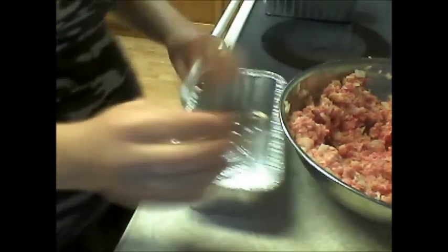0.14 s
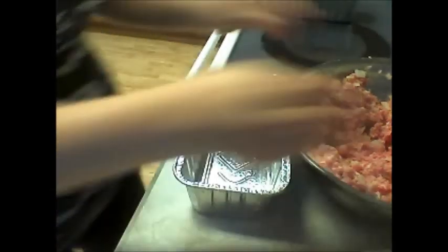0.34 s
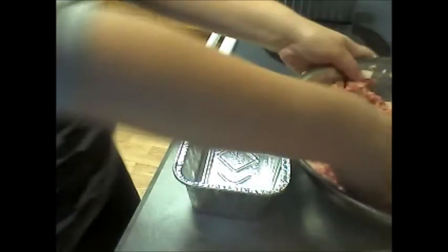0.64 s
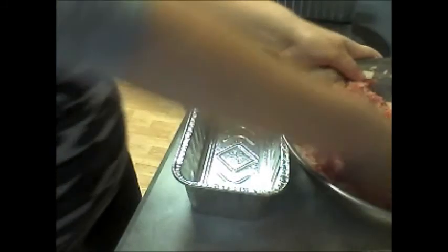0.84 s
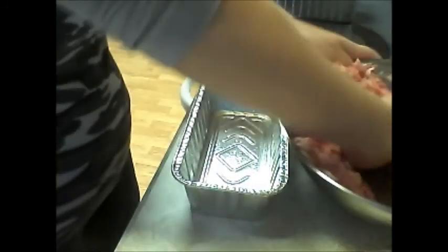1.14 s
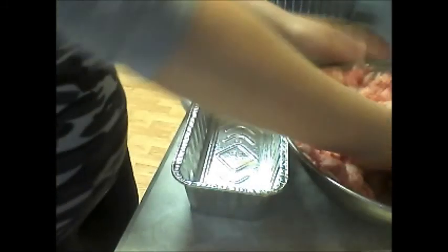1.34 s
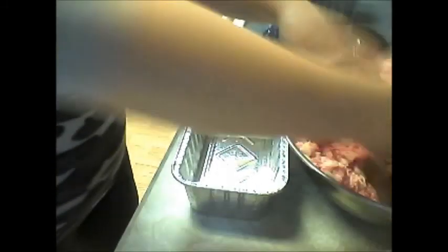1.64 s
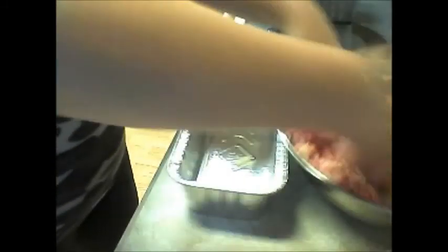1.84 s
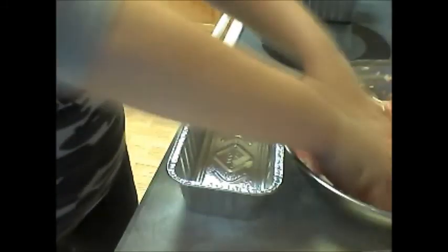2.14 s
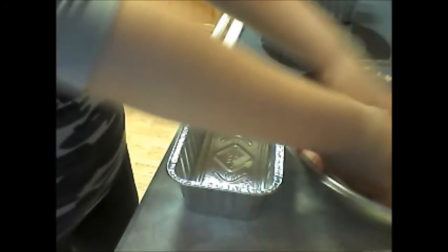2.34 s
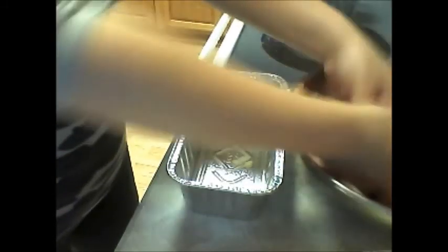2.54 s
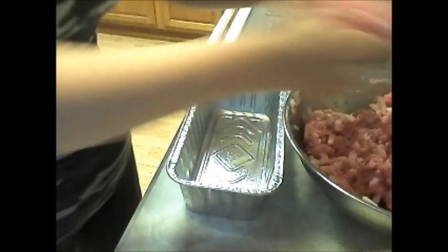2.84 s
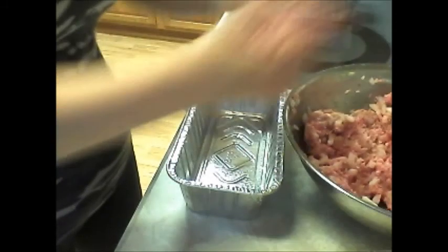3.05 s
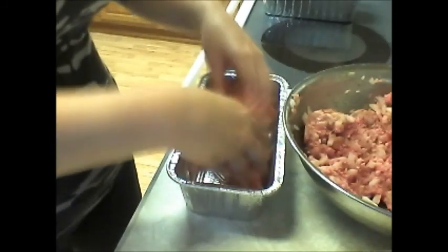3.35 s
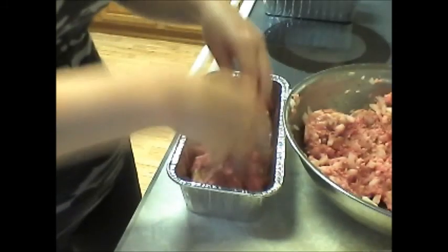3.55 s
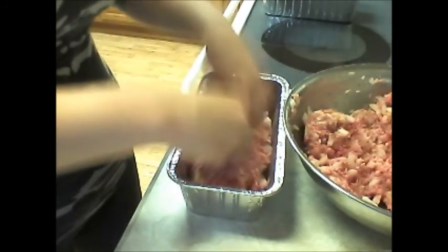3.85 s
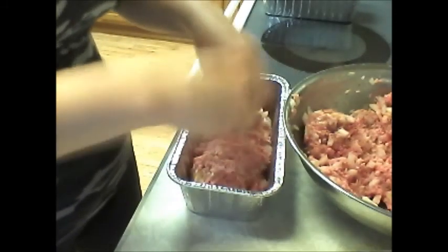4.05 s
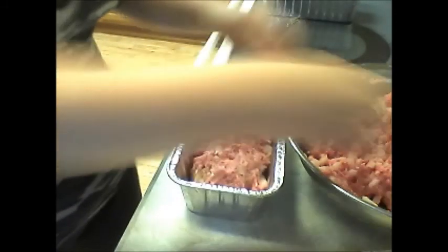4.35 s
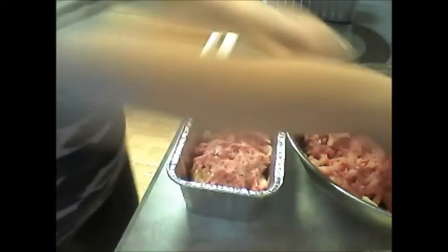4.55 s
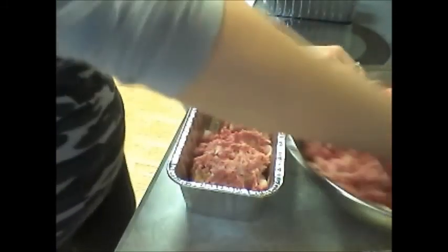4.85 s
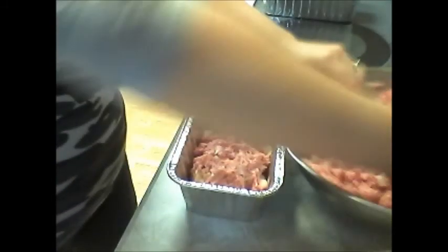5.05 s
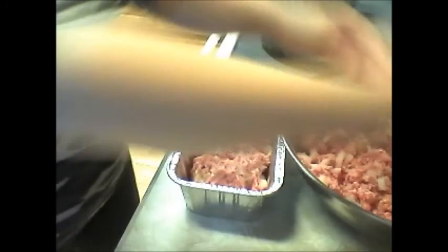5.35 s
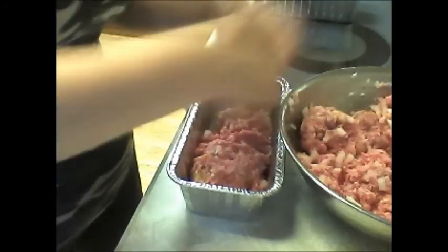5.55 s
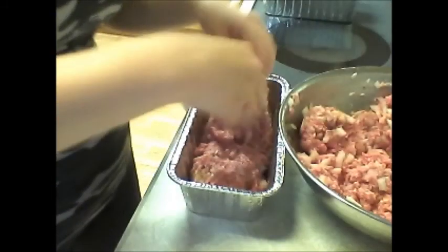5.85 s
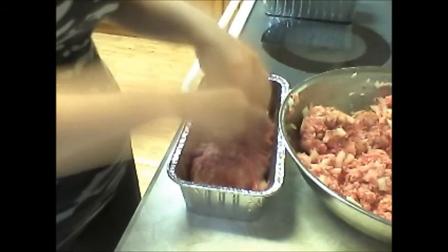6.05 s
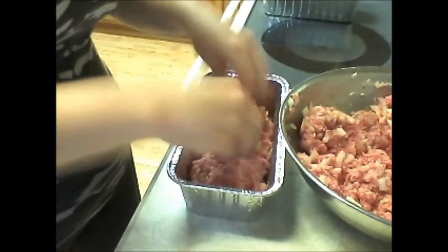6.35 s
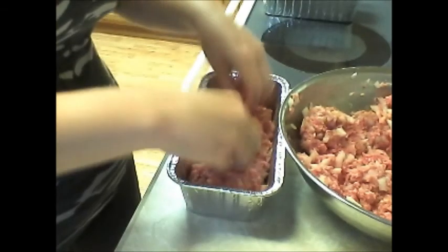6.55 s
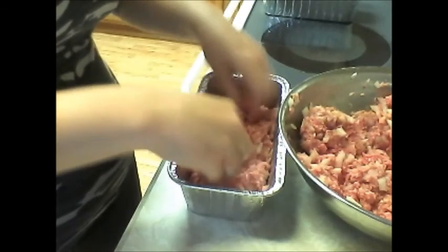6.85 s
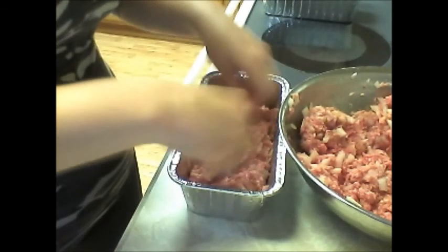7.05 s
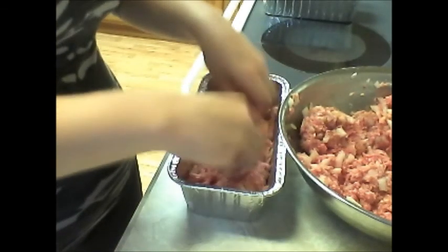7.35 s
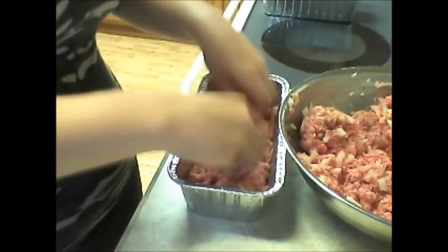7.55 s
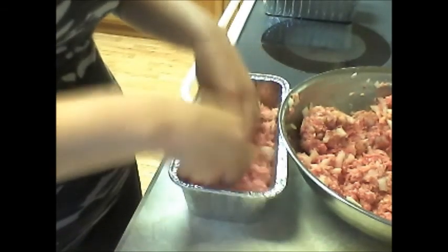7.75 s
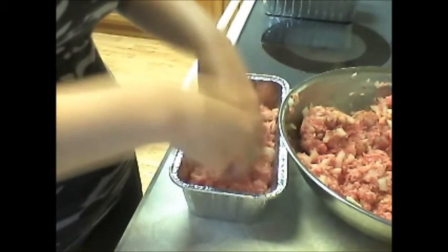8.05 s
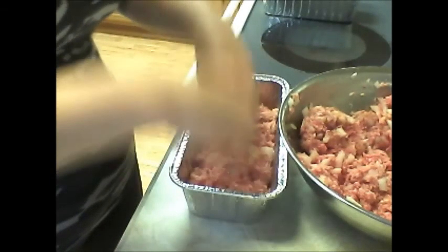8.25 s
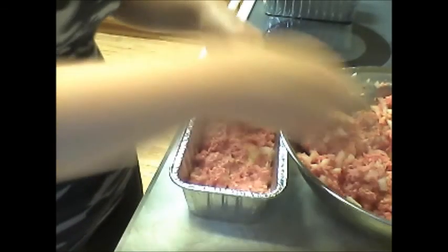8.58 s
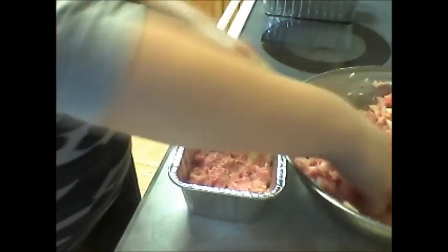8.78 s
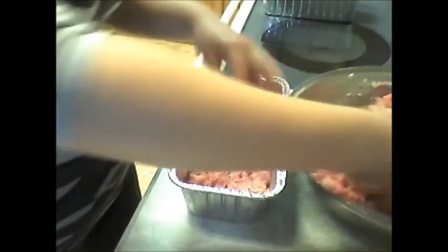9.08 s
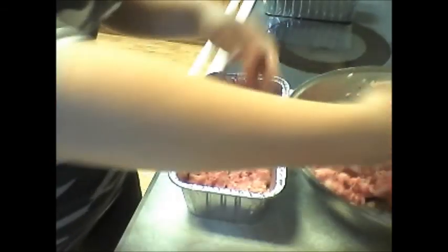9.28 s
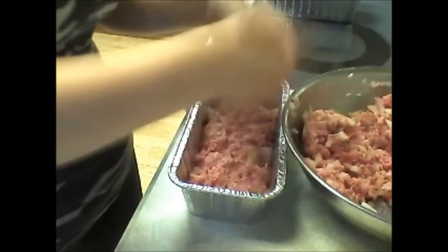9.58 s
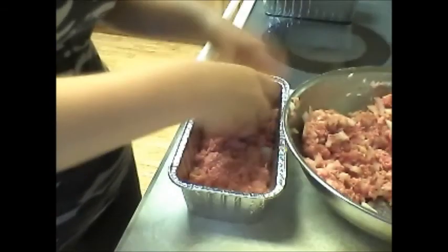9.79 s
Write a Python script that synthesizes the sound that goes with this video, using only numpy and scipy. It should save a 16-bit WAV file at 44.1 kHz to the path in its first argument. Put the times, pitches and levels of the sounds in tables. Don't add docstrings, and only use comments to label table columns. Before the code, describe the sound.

In a small kitchen, a steel bowl scrapes, clacks and thumps while hands dig out minced meat. It rattles briefly as it settles, then a sharp crack and foil crinkles follow. Quiet pressing with sparse ticks fills the middle before the bowl bangs and rocks faster to rest. A close, dull small microphone picks up counter bumps and refrigerator hum.

```python
import sys
import numpy as np
from scipy import signal
from scipy.fft import rfft, irfft, next_fast_len
from scipy.io import wavfile
from scipy.ndimage import uniform_filter1d, map_coordinates

SR = 44100
rng = np.random.default_rng(int(sys.argv[2]) if len(sys.argv) > 2 else 0)


def digitize_waveform(pressure):
    field = np.atleast_2d(pressure).T
    bounded = np.clip(field, -1, 1)
    quanta = np.round(bounded * 32767).astype(np.int16)
    wavfile.write(sys.argv[1], SR, quanta)


def magnitude_from_level(level_db):
    exponent = np.asarray(level_db, float) / 20
    return 10 ** exponent


N = 437472
GRID_HZ = np.fft.rfftfreq(8192, 1 / SR)

# centre_hz, width_hz, level_db
BOWL_MODES = [(400, 57, 8), (624, 165, 2.5), (780, 122, 4.5), (895, 70, 2.5), (1051, 85, 1.5),
              (1180, 60, 3), (1352, 178, 4.5), (1650, 320, 4.5), (1860, 330, 4), (2820, 696, 0)]
# centre_hz, width_hz, level_db
FOIL_MODES = [(2830, 750, -1), (4300, 1100, -2.5), (5500, 770, 2.5), (6580, 2700, -5)]
# centre_s, peak_db, pitch_hz
HAND_PUSHES = [(0.119, -32, 40.2), (0.251, -29, 30.1), (1.355, -29.5, 51), (1.471, -28.5, 35.6),
               (1.827, -33.5, 41), (1.959, -28, 28.4), (3.450, -46, 31.2), (4.085, -44, 45),
               (4.78, -32.5, 28.1), (5.639, -40.5, 45.2), (5.940, -49, 31.8), (6.248, -35.5, 34.5),
               (6.519, -36.5, 31.2), (7.092, -41.5, 37.5), (7.366, -37, 27.3), (7.740, -48.5, 30),
               (7.943, -47, 32.8), (8.400, -28, 29.4), (8.805, -32.5, 35.5), (9.04, -38, 33)]
RATTLE_TAPS = [
    2.216,
    2.2825,
    2.361,
    2.4265,
]

RATTLE_LOSS_DB = 4.5
ROCK_FADE_DB = 1
FOIL_RISE_MS, RIM_RISE_MS = 1.8, 0.78


def unit(x):
    return x / np.sqrt(np.mean(x ** 2) + 1e-20)


def along(points, hz):
    f, v = np.transpose(points)
    return np.interp(np.log(hz + 1), np.log(f + 1), v)


def curves(rows):
    s, *cols = np.transpose(rows)
    return [np.interp(np.arange(N) / SR, s, c, -150, -150) for c in cols]


def wobble(rate_hz):
    coarse = np.arange(0, N + 16, 16)
    knots = rng.standard_normal(int(N * rate_hz / SR) + 4)
    return np.interp(np.arange(N), coarse, map_coordinates(knots, [coarse * rate_hz / SR]))


def filtered(x, response):
    m = next_fast_len(N + SR // 2)
    return irfft(rfft(x, m) * response(np.fft.rfftfreq(m, 1 / SR)), m)[..., :N]


def resonances(modes):
    norm = np.sqrt(sum(magnitude_from_level(2 * db) * w for c, w, db in modes) * np.pi / SR)

    def response(f):
        total = 0
        for k, (c, w, db) in enumerate(modes):
            total = total + (-1) ** k * magnitude_from_level(db) * 1j * f * w / (c * c - f * f + 1j * f * w)
        return total / norm

    return response


def ring(hz, t60_s, attack_s):
    t = np.arange(SR // 4) / SR
    return np.sin(2 * np.pi * hz * t) * magnitude_from_level(-60 * t / t60_s) * (1 - np.exp(-t / attack_s))


def add(track, s, sound):
    part = track[round(s * SR):][:len(sound)]
    part += sound[:len(part)]


def kitchen():
    # freq_hz, density_db
    air_spectrum = [(12, -47.5), (20, -15.5), (58, -2), (97, -22.5), (209, -15.5), (284, -27.5),
                    (385, -20.5), (729, -29), (1530, -29.5), (2680, -34.5), (3280, -34.5), (3540, -37),
                    (5460, -32), (6210, -35.5), (8870, -57), (11500, -97), (19500, -120)]
    # pitch_hz, rms_db
    hum_tones = [(48.4, -61), (118.4, -68), (204.6, -71), (360.7, -80.5), (473.7, -79.5), (1195, -87),
                 (1545, -86.5), (3241, -85.5), (4037, -85.5)]
    # time_s, pitch_hz, level_db
    whine_track = [(5.2, 2030, -92), (5.45, 2040, -77), (5.75, 2015, -76), (6.12, 2040, -75),
                   (6.3, 2000, -75), (6.55, 2000, -77), (6.64, 2035, -72), (6.86, 1995, -72),
                   (7.1, 1985, -84), (7.3, 2015, -76), (7.6, 2015, -77), (7.8, 1980, -76),
                   (7.95, 1975, -82), (8.25, 1970, -73), (8.5, 1970, -92)]
    t = np.arange(N) / SR
    air_db = -59.5 + 1.2 * wobble(3.35)
    air = magnitude_from_level(air_db) * unit(filtered(rng.standard_normal(N), lambda f: magnitude_from_level(along(air_spectrum, f))))
    hum = np.zeros(N)
    for hz, db in hum_tones:
        level = magnitude_from_level(db + 5.0 + 2.6 * wobble(6.1))
        hum += level * np.sin(2 * np.pi * hz * t + 1.1 * wobble(5.9))
    whine_hz, whine_db = curves(whine_track)
    turn = 2 * np.pi * np.cumsum(whine_hz + 8 * wobble(40)) / SR
    whine = np.zeros(N)
    for order, order_db in [(11, -1), (12, 0), (13, -10)]:
        whine += magnitude_from_level(whine_db + order_db + 2.5 * wobble(15)) * np.sin(order / 12 * turn)
    return air + hum + whine


def room(x):
    # freq_hz, t60_s
    decay = [(100, 0.069), (1000, 0.3), (3000, 0.17), (8000, 0.037)]
    hz, t, z = signal.stft(rng.standard_normal(SR // 2), SR, nperseg=256)
    tail = signal.istft(z * magnitude_from_level(-60 * t / along(decay, hz)[:, None]), SR, nperseg=256)[1]
    return signal.fftconvolve(np.pad(x, (200, 0)), tail / np.linalg.norm(tail))[:N]


def pushes():
    out, t = np.zeros(N), np.arange(-SR // 10, SR // 10) / SR
    for s, db, hz in HAND_PUSHES:
        add(out, s + t[0], -magnitude_from_level(db) * np.cos(2 * np.pi * hz * t) * np.exp(-(t * hz / 0.57) ** 2))
    return out


def rocking():
    first_s, swing_s, swing_shrink = 8.687, .164, .745
    edge_lag_s, lag_shrink = .046, .68
    blows, hits = [], []
    for k in range(5):
        s = first_s + swing_s * (1 - swing_shrink ** k) / (1 - swing_shrink)
        edge_s = s + edge_lag_s * lag_shrink ** k
        fade_db = ROCK_FADE_DB * k * k
        blows.append((s, -18.5 - fade_db, -14.5 + 0.52 * fade_db, -26 + 1.1 * fade_db))
        blows.append((edge_s + 0.001, -32.5 - 1.3 * fade_db, -6, 0.6))
        hits.append((s + 0.00093, -38.5 - 1.3 * fade_db, 1500 - 31 * k, RIM_RISE_MS, 6.5))
        hits.append((edge_s, -30 - 2.5 * fade_db, 2030 - 120 * k, RIM_RISE_MS, 5))
        hits.append((s + .006, -34 - 1.33 * fade_db, 790 - 15 * k, 4.5, 22))
    for k, s in enumerate(RATTLE_TAPS):
        blows.append((s - .001, -39 - 1.25 * RATTLE_LOSS_DB * k, -7, -11))
        hits.append((s, -38.5 - RATTLE_LOSS_DB * k, 1250, RIM_RISE_MS, 8.7))
    return blows, hits


def thumps():
    # start_s, panel_db, cabinet_re_panel_db, sway_re_panel_db
    counter_blows = [(.1488, -26.5, 2.5, -3), (0.199, -36, 2, -2.5), (0.379, -46, -13, -3),
                     (0.424, -51, 0, -14), (0.518, -49, 4, -19), (0.864, -30.5, -6.5, -15.5),
                     (.956, -42, -12, -10.5), (1.389, -31, -4.5, -10), (1.881, -19, -7, -12.5),
                     (2.089, -42, -1, 3.5), (2.113, -33.5, -1.5, -11), (2.908, -34.5, -8, -19),
                     (4.157, -38, -5.5, -11), (4.452, -36.5, -31, -26), (4.666, -31.5, -0.5, 2.5),
                     (6.514, -56, -3, -11), (6.777, -42, -3.5, -11), (8.332, -41.5, -2.5, 1.5),
                     (8.482, -15, -15, -16), (8.572, -34.5, -4, -4.5), (8.636, -41, 5, -0.5),
                     (9.224, -43, -4.5, -3.5), (9.355, -36, -9.5, -25)]
    out = np.zeros(N)
    for s, db, cabinet_db, sway_db in counter_blows + rocking()[0]:
        detune = 1 + .015 * rng.standard_normal(3)
        sway_hz = 55.9 * np.exp(0.12 * rng.standard_normal())
        panel = ring(232 * detune[0], 0.065, attack_s=0.0034)
        panel += 0.9 * ring(190 * detune[1], 0.055, attack_s=0.003)
        panel += 2 * ring(415 * detune[2], .07, attack_s=.003)
        cabinet = ring(124 * detune[2], 0.17, attack_s=0.0038)
        cabinet += 0.61 * ring(88 * detune[0], 0.12, attack_s=0.00064)
        sway = ring(sway_hz, 0.2, attack_s=0.00057) + .35 * ring(31, .4, attack_s=.01)
        add(out, s, magnitude_from_level(db + 4.5) * panel)
        add(out, s + 0.0022, magnitude_from_level(db + cabinet_db + 6.5) * cabinet)
        add(out, s + 0.005, -magnitude_from_level(db + sway_db + 11.5) * sway)
    return filtered(out, lambda hz: 1 / np.sqrt(1 + (hz / 275) ** 12))


def strokes():
    # start_s, end_s, scrape_db, crinkle_db, drone_db
    drags = [(0.155, 0.358, -49.5, -60, -49.5), (0.411, 0.593, -39.5, -60, -47),
             (0.643, 0.804, -47.5, -62.5, -57.5), (0.848, 1.064, -47, -77, -46),
             (1.436, 1.52, -53.5, -61, -54.5), (1.577, 1.89, -50, -60.5, -62.5),
             (1.916, 2.123, -45.5, -56.5, -54), (2.21, 3.29, -75, -70.5, -75),
             (4.182, 4.239, -43.5, -48.5, -49), (4.282, 4.511, -45, -50, -53.5),
             (5.583, 5.652, -53, -55, -62), (5.705, 8.25, -77, -71.5, -79), (8.327, 8.38, -37, -50, -45),
             (8.488, 8.766, -53.5, -75.5, -48.5), (9.127, 9.25, -75, -69.5, -55)]
    grip_db_per_s, release_db_per_s = 491.5, 338.5
    squish_s, squish_db = 0.012, (-27.5, -32.5, -24)
    squeezes = [(s, s + squish_s, *np.add(db, squish_db)) for s, db, hz in HAND_PUSHES]
    start, end, *levels = np.transpose(drags + squeezes)[:, :, None]
    t = np.arange(0, N / SR + .002, .002)
    shape_db = -grip_db_per_s * np.maximum(start - t, 0) - release_db_per_s * np.maximum(t - end, 0)
    held = curves(np.transpose([t] + [(db + shape_db).max(axis=0) for db in levels]))
    return np.array(held) + 3 * wobble(14)


def rub():
    flecks_per_s, fleck_db = 160, 19
    scrape_db, crinkle_db, drone_db = strokes()
    clumps_db = 2 * wobble(70) + 4.5 * wobble(500)

    def grains(share):
        friction = magnitude_from_level(share * clumps_db) * rng.standard_normal(N)
        flecks = (rng.random(N) < flecks_per_s / SR) * magnitude_from_level(fleck_db) * rng.standard_normal(N)
        return unit(friction + share ** 2 * flecks)

    scrape = filtered(magnitude_from_level(scrape_db) * grains(0.89), resonances(BOWL_MODES[5:] + FOIL_MODES[:1]))
    crinkle = filtered(magnitude_from_level(crinkle_db) * grains(0.82), resonances(FOIL_MODES))
    drone = filtered(magnitude_from_level(drone_db) * grains(1.0), resonances(BOWL_MODES[:5]))
    shaking = magnitude_from_level(drone_db + 1.5 + clumps_db) * rng.standard_normal(N)
    rumble = filtered(shaking, lambda hz: resonances([(150, 140, 0)])(hz) ** 2 / 12)
    return scrape + crinkle + drone + rumble


def contact(s, db, hz, rise_ms, fall_ms, body, sharpness, grain_db, edge_db):
    rise_s, t = max(rise_ms, .2) / 1000, np.arange(-1764, 6428) / SR
    shape = magnitude_from_level(np.where(t < 0, -9.5 * abs(t / rise_s) ** 2.34, -8000 * t / max(fall_ms, 1)))
    grains = magnitude_from_level(grain_db * np.repeat(rng.standard_normal(256), 32)) * rng.standard_normal(len(t))
    grains[t == 0] += 7 * (3000 / hz) ** 1.02 / max(rise_ms, .5)
    band = resonances([(hz, hz / sharpness, 0)])(GRID_HZ) ** 2
    sound = irfft(rfft(shape * grains) * body * band)
    sound /= np.sqrt(uniform_filter1d(sound ** 2, size=256).max())
    edge_band = resonances([(2.1 * hz, 1.4 * hz, 0)])(GRID_HZ) ** 2
    edge = irfft(rfft(grains * (t >= 0) * magnitude_from_level(-60 * abs(t) / 0.031)) * edge_band)
    return s + t[0], magnitude_from_level(db) * (sound + magnitude_from_level(edge_db) / max(rise_ms, .7) * edge / abs(edge).max())


def details():
    # start_s, peak_db, pitch_hz, t60_s
    pings = [(.194, -43, 789, 0.2), (.25, -42, 820, 0.099), (.279, -46, 787, 0.17), (.31, -44, 836, 0.11),
             (.357, -36.5, 556, 0.21), (.418, -40, 517, .2), (0.776, -32.5, 1290, 0.033),
             (2.43, -62, 2050, 0.38), (2.45, -52.5, 894, 0.041), (4.64, -47, 735, .15),
             (4.668, -36, 780, 0.11), (4.664, -30, 400, 0.051), (6.779, -41, 337, 0.058),
             (8.3254, -19.5, 1101, 0.06), (8.488, -29, 790, 0.2), (8.737, -34.5, 865, 0.077),
             (8.856, -40, 787, 0.13), (0.9558, -18.5, 1180, 0.071), (1.3885, -23.5, 561, 0.17),
             (8.615, -40, 806, 0.1), (9.3572, -20, 426, 0.097), (1.348, -30, 553, 0.12),
             (9.3572, -8.5, 537, 0.026), (9.3574, -18.5, 1614, 0.03), (.8805, -23.5, 572, 0.067),
             (.8975, -21, 617, 0.064), (.955, -24, 592, .17), (.9555, -31, 863, 0.11),
             (.96, -30, 1452, 0.1), (1.3475, -25, 1150, 0.052), (2.9105, -25, 600, 0.043)]
    # peak_s, level_db, centre_hz, fall_ms_per_8db
    creases = [(.21, -53.5, 3300, 2), (.262, -55, 4000, 2), (0.343, -45, 6800, 7), (0.444, -47, 3500, 15),
               (0.471, -48, 4500, 6), (0.499, -40, 2800, 7), (.62, -51, 3500, 1), (.64, -52.5, 4200, 5),
               (0.802, -45, 3020, 0), (2.63, -57, 2500, 6), (2.697, -56, 4500, 5), (4.152, -54, 1500, 3),
               (4.185, -45, 2800, 9), (4.193, -31, 6230, 4), (4.224, -40, 1800, 12), (4.255, -44, 3200, 2),
               (4.277, -56, 6500, 4), (4.3227, -41.5, 1830, 5), (4.3347, -36, 4300, 13),
               (4.3546, -36, 2900, 2.5), (4.379, -44.5, 3000, 7.5), (4.4187, -40.5, 1880, 8.5),
               (4.4466, -38.5, 2760, 16.5), (4.481, -41, 1500, 8.5), (4.54, -54, 5800, 11),
               (4.548, -54.5, 1300, 3), (8.302, -45.5, 1890, 8), (8.384, -42, 3200, 11),
               (8.423, -48, 3970, 7), (8.45, -43.5, 1300, 6), (8.473, -46, 1500, 13),
               (8.505, -40, 3000, 13), (8.553, -46, 4500, 2), (8.589, -40, 3500, 2.5), (8.69, -44, 3300, 4),
               (8.755, -54, 3770, 4), (.394, -46, 4000, 2)]
    # peak_s, level_db, centre_hz, fall_ms_per_8db
    squishes = [(5.575, -60, 1640, -2), (5.593, -54, 1890, 0), (5.725, -54.5, 4470, 4),
                (5.752, -53, 552, 8), (5.907, -58, 1860, 15), (5.958, -57, 616, 19), (5.96, -53.5, 4000, 2),
                (5.993, -51.5, 1680, 17), (6.011, -51, 557, 13), (6.21, -59, 6500, 9), (6.22, -58, 2000, 9),
                (6.37, -59, 1850, 5), (6.515, -54.5, 5500, 4), (6.546, -60, 1630, -1),
                (6.549, -54.5, 5000, 2), (6.63, -57, 1900, 9), (6.87, -47.5, 5100, 5.5),
                (6.908, -56, 3000, 6), (7.069, -54.5, 1500, 8), (7.138, -55, 990, 7), (7.243, -58, 5200, 3),
                (7.378, -67, 501, 3), (7.405, -52.5, 6550, 4), (7.63, -63, 5500, 7)]
    # peak_s, level_db, centre_hz, fall_ms_per_8db
    tails = [(.975, -35.5, 1000, 39), (1.586, -42, 1600, 5), (1.69, -49, 4500, 4), (4.16, -40.5, 674, 43),
             (4.33, -47.5, 750, 62), (4.46, -43.5, 713, 19), (9.369, -39, 1900, 31.5),
             (9.37, -33.5, 990, 39), (1.93, -39, 3000, 4), (8.6, -55, 2600, 11), (9.362, -37.5, 3040, 7.5),
             (5.3, -61.5, 5500, 57)]
    # start_s, peak_db, pitch_hz
    hard_clicks = [(4.6634, 1.5, 4900), (4.6601, -12, 2600), (.6778, -17.5, 3900), (2.2165, -27.5, 2100),
                   (8.3252, -22, 2300), (1.3474, -30, 2100), (0.62, -27, 3000), (.909, -19, 2200)]
    click_cycles = 5.7
    out, plain = np.zeros(N), np.ones_like(GRID_HZ)
    taps, sprays, edge_clicks = [], [], []
    for k, s in enumerate(RATTLE_TAPS):
        taps.append((s + .0008, -27 - 1.2 * k * k, 1437 * (1 + .02 * rng.standard_normal()), .022))
        sprays.append((s + 0.00086, -41.5 - 1.9 * RATTLE_LOSS_DB * k, 2900 - 400 * k, 6))
    for k, hit in enumerate(rocking()[1][1:15:3]):
        fade_db = ROCK_FADE_DB * k * k
        sprays.append((hit[0] + .0015, -36.5 - 3.2 * fade_db, 3140 - 300 * k, 11))
        edge_clicks.append((hit[0], -24 - 2.8 * fade_db, 2600))
    for s, db, hz, t60_s in pings + taps:
        add(out, s, magnitude_from_level(db) * ring(hz, t60_s, attack_s=.0007))
    for s, db, hz, fall_ms in creases + squishes + tails + sprays:
        add(out, *contact(s, db - 4.5, hz, FOIL_RISE_MS, fall_ms, plain,
                          sharpness=2.8, grain_db=3.5, edge_db=-26))
    for s, db, hz in hard_clicks + edge_clicks:
        add(out, s, -magnitude_from_level(db) * ring(hz, click_cycles / hz, attack_s=.00003))
    return out


def contacts():
    # peak_s, level_db, centre_hz, fall_ms_per_8db
    snaps = [(.1514, -44, 3630, 6), (.368, -39, 5500, 4.5), (.6787, -32.5, 3820, 3.5),
             (.7126, -42, 5270, 9), (.752, -37.5, 5170, 2.5), (.8506, -34, 4150, 16),
             (.889, -31.5, 5240, 14.5), (1.348, -29.5, 5700, 13.5), (1.3877, -28, 5030, 7),
             (1.625, -36, 4630, 3.5), (1.8843, -32.5, 3670, 15.5), (1.9183, -34.5, 5200, 2.5),
             (2.074, -39, 4300, 7.5), (2.8417, -47, 6440, 19), (4.286, -36, 3130, 4.5),
             (4.4694, -30.5, 5000, 4), (4.5132, -35.5, 5170, 2.5), (4.6645, -18, 5700, 6.5),
             (8.327, -24.5, 5760, 14), (8.4839, -29.5, 4800, 4), (8.6447, -29, 4630, 4),
             (4.6645, -22, 3160, 7)]
    # peak_s, level_db, centre_hz, fall_ms_per_8db
    clacks = [(.112, -45.5, 1700, 5.5), (.3584, -33.5, 1080, 15), (.57, -33.5, 1940, 27.5),
              (.6779, -34, 2200, -6), (.711, -36, 1480, 16), (.7532, -35.5, 1390, 7.5),
              (.8003, -38, 1900, 7), (.8189, -38, 1870, 6.5), (.853, -38.5, 1900, 10),
              (.9552, -20.5, 1065, 15), (1.3473, -31.5, 1280, 61), (1.385, -31.5, 1250, 20),
              (1.6209, -36.5, 1360, 9), (1.8836, -32.5, 1650, 33), (1.9888, -32.5, 1720, 7),
              (3.1864, -45.5, 1660, 10), (4.665, -23, 1930, 5.5), (6.513, -44, 2050, 3),
              (6.8977, -46, 1430, 4.5), (8.3257, -21.5, 1200, 10), (8.4816, -32, 1630, 14),
              (8.5725, -28.5, 1800, 7), (8.6444, -27.5, 1220, 7), (9.3579, -30, 2050, 5.5)]
    # peak_s, level_db, centre_hz, fall_ms_per_8db
    knocks = [(.1, -45.5, 490, 10), (.42, -38.5, 583, 41.5), (.884, -32, 560, 3), (.8985, -21.5, 666, 21.5),
              (1.3498, -29, 595, 28), (1.39, -29.5, 576, 20), (1.8857, -30.5, 584, 8.5),
              (6.779, -33.5, 460, 7.5), (7.0929, -49, 415, -1), (8.6432, -31.5, 500, 2),
              (9.2206, -38, 594, 16), (9.359, -27.5, 804, 7)]
    # peak_s, level_db, centre_hz
    pan_ticks = [(1.681, -47.5, 4500), (2.119, -48.5, 3880), (3.1876, -46.5, 5200), (3.286, -45.5, 5930),
                 (5.615, -43.5, 3680), (6.0143, -41, 5200), (6.598, -31.5, 6700), (6.89, -41, 6100),
                 (6.9, -29, 5270), (7.1646, -37, 5070), (7.462, -47.5, 5970), (7.761, -38.5, 6600),
                 (8.299, -47, 5600), (8.614, -44, 3000), (9.833, -51, 5250)]
    # peak_s, level_db, centre_hz, length_ms
    rustles = [(0.205, -47.5, 6400, 18), (0.5334, -37.5, 3750, 29), (0.581, -34.5, 4000, 27),
               (0.917, -28.5, 5040, 21), (0.963, -34.5, 5000, 11), (1.034, -52, 5500, 11),
               (1.776, -33.5, 4000, 36), (1.998, -40, 3300, 35), (2.0253, -34.5, 2950, 16),
               (2.72, -63, 5500, 170), (2.908, -28.5, 5500, 16), (4.96, -59.5, 5500, 44),
               (5.701, -59, 5240, 240), (4.167, -47, 7000, 12), (4.204, -27, 5200, 13),
               (4.363, -32, 3730, 19), (4.421, -39.5, 3730, 10), (4.491, -37, 4630, 8.9),
               (4.7, -32.5, 4300, 23), (6.284, -52, 4400, 49), (7.071, -56, 5500, 19),
               (8.525, -38.5, 3580, 26), (9.545, -59, 5900, 39), (9.69, -58, 5260, 33),
               (9.776, -56.5, 5500, 150)]
    # peak_s, level_db, centre_hz, length_ms
    bumps = [(.26, -52, 885, 85), (.3695, -32.5, 543, 31), (0.421, -46, 1210, 9.1), (.975, -32.5, 845, 48),
             (1.3094, -41.5, 700, 24), (1.7843, -36.5, 1710, 58), (2.029, -34, 1860, 34),
             (2.0937, -39.5, 1530, 13), (2.1007, -39, 690, 17), (2.9106, -31.5, 1110, 32),
             (2.915, -31, 600, 41), (2.988, -42, 440, 8.1), (2.988, -43.5, 1350, 15), (4.2, -45, 780, 19),
             (4.6719, -30.5, 780, 37), (5.69, -47, 620, 70), (6.06, -52.5, 617, 33),
             (6.285, -50.5, 1500, 19), (7.399, -52, 1310, 16), (8.333, -23.5, 580, 12),
             (8.4934, -31, 700, 22), (8.583, -35.5, 660, 17), (8.6223, -31.5, 704, 15),
             (9.25, -48, 780, 13)]
    out = np.zeros(N)
    bowl = resonances(BOWL_MODES)(GRID_HZ)
    foil = resonances([(1500, 1500, -12)] + FOIL_MODES)(GRID_HZ)
    rows = []
    for group, rise_ms in [(snaps, FOIL_RISE_MS), (clacks, RIM_RISE_MS), (knocks, 1.74)]:
        rows += [(s, db, hz, rise_ms, fall_ms) for s, db, hz, fall_ms in group]
    rows += [(s, db, hz, FOIL_RISE_MS, 3.8) for s, db, hz in pan_ticks]
    rows += [(s, db, hz, 0.5 * ms, 0.5 * ms) for s, db, hz, ms in rustles + bumps]
    for row in rows + rocking()[1]:
        hz = row[2]
        if hz > 2700:
            add(out, *contact(*row, foil, sharpness=1.41, grain_db=2.0, edge_db=-24.5))
        elif hz > 1000:
            add(out, *contact(*row, bowl, sharpness=1.18, grain_db=6, edge_db=-5.5))
        else:
            add(out, *contact(*row, bowl, sharpness=1.72, grain_db=3.0, edge_db=-15))
    return magnitude_from_level(-3.5) * out


def scene():
    near = contacts() + rub() + details()
    solid = thumps() + pushes() + kitchen()
    return (near + magnitude_from_level(-17.0) * room(near) + solid)[None]


def band_limit(x):
    return signal.sosfilt(signal.butter(12, 15600, fs=SR, output="sos"), x)


def record(dry):
    # freq_hz, gain_db
    mic_response = [(20, 1.5), (6500, -1), (7400, -6.5), (8000, -19), (9000, -20), (9400, -81.5)]
    heard = filtered(dry, lambda hz: magnitude_from_level(along(mic_response, hz)))
    mix = heard + magnitude_from_level(-94.0) * rng.standard_normal(dry.shape)
    return band_limit(mix)


dry = scene()
out = record(dry)
digitize_waveform(out)
```